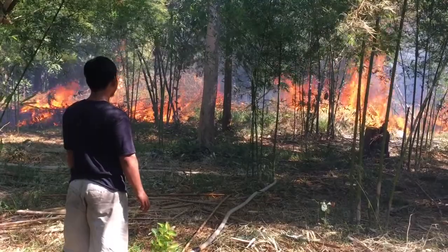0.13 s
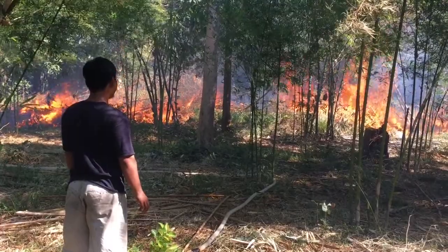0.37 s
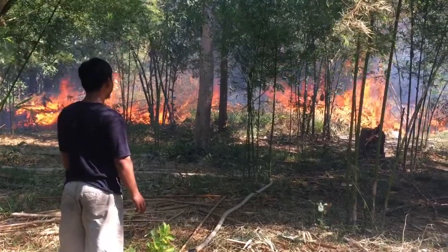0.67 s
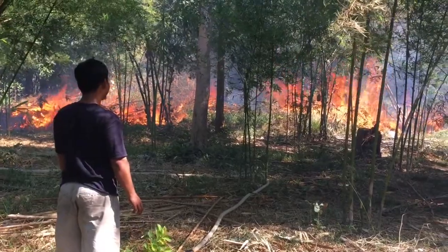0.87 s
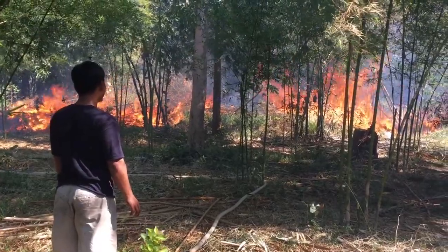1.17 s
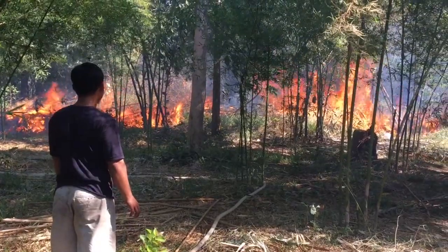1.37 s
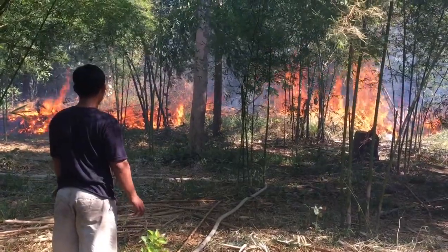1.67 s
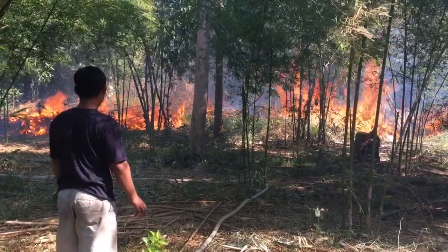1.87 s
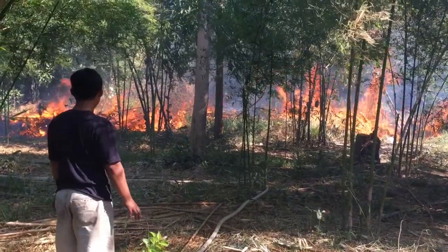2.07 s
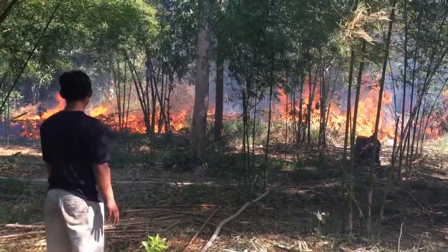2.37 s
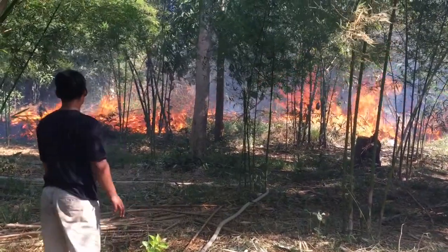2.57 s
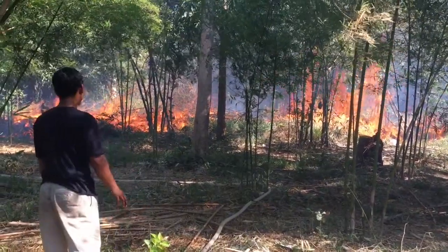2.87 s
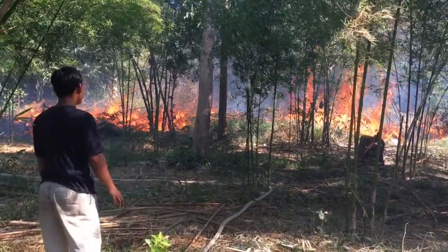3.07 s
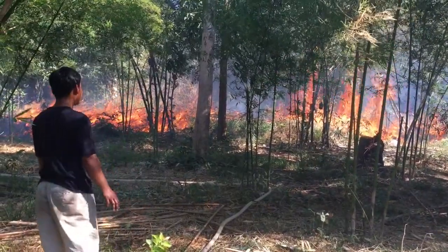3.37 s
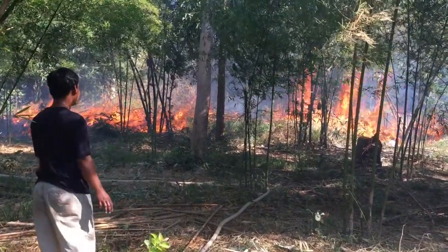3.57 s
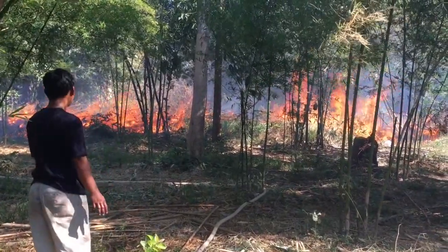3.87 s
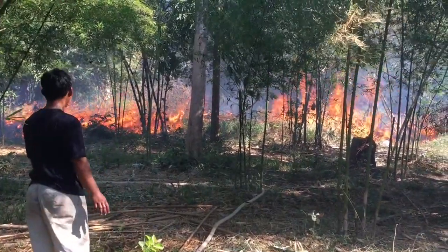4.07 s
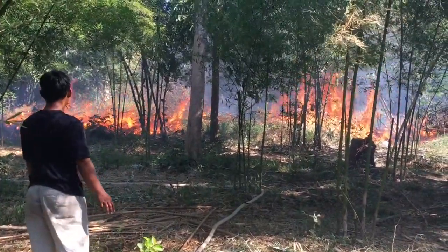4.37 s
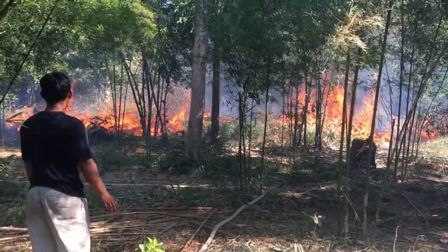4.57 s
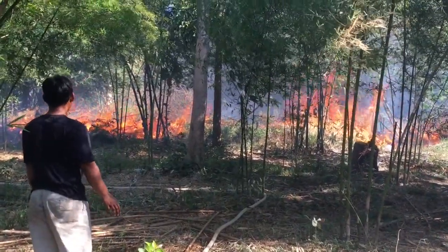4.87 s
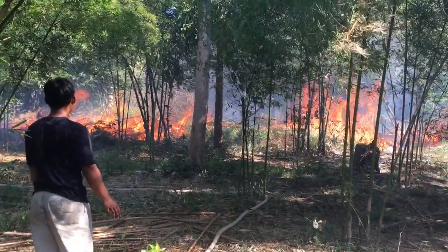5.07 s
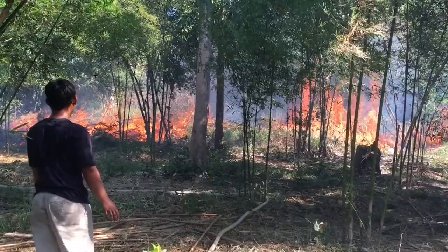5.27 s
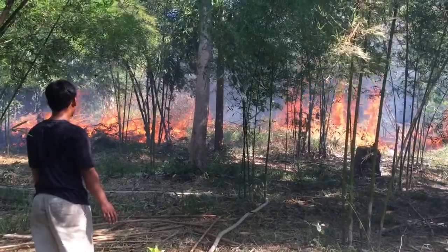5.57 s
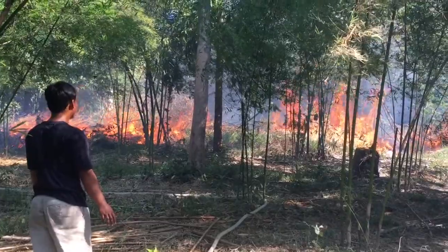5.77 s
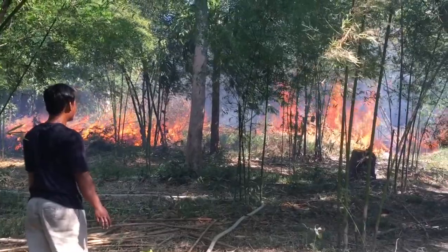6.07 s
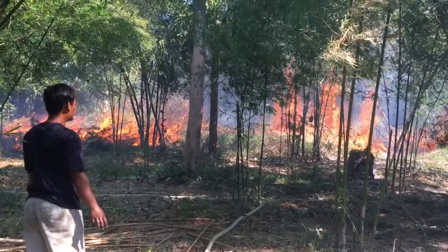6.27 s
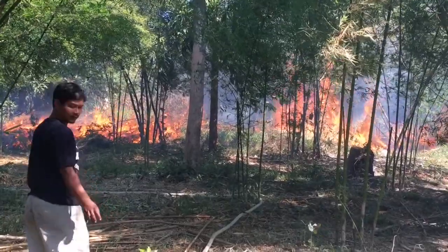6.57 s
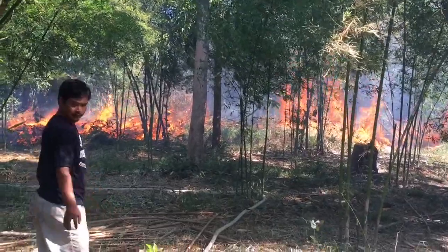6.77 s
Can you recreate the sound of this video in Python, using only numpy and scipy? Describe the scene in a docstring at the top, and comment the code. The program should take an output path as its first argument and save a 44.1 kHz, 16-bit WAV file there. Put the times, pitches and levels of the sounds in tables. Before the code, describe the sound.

Burning bamboo pops and cracks irregularly, with occasional loud culm explosions echoing among the stems over sizzling steam and a soft, billowing rumble.

```python
"""Sharp pops and a few heavy bursts ring out over crackle, hiss and a low rumble: fire in a bamboo grove.
It runs through the undergrowth some twenty metres from a hand-held microphone.
Splitting stems are damped pulses; a sealed culm is a crack with a thud, and a rip before or after the thud.
Twigs and leaves snap at random. Reports scatter among near stems, glance off the ground and echo in the grove.
Under them, banded noise ticks make the hiss of sap and steam, and low noise makes the rumble of the flames."""
import sys
import numpy as np
from scipy import signal
from scipy.fft import rfft, irfft
from scipy.io import wavfile
from scipy.ndimage import uniform_filter1d, minimum_filter1d

SR = 44100
rng = np.random.default_rng(int(sys.argv[2]) if len(sys.argv) > 2 else 0)


def transcribe(u):
    """Save the signal u as a 16-bit wav file named by the first command-line argument.

    u: samples, shape (n,) or (channels, n), limited to [-1, 1]; the rate is SR.
    q: integer samples, one column per channel.
    """
    v = np.clip(np.atleast_2d(u).T, -1, 1)
    q = np.round(v * 32767).astype(np.int16)
    wavfile.write(sys.argv[1], SR, q)


N = 305613
TIME = np.arange(N) / SR

# The loudest splitting stems, levels relative to one another:
# (time [s], level [dB], pitch [Hz], spread [octaves], scattered share [dB])
SPLITTING_STEMS = [(.0219, -10, 3600, 0.71, -27), (.17, -15, 2530, 0.38, -4), (.3124, -14, 2500, 0.52, -22),
                   (.3747, -15, 3680, 1.06, -1), (.4319, -6, 5630, 0.48, -20),
                   (.7237, -17, 5260, 0.42, -22), (.8495, -8, 1460, 0.77, -4), (.8736, -12, 4900, 1.2, -15),
                   (.9145, -11.5, 2800, 0.58, -4), (.9187, -9, 2950, 0.53, -11),
                   (.9926, -18, 7450, 0.65, 6), (1.0357, -18, 10000, 0.85, -2),
                   (1.0956, -14, 2530, 0.9, -10), (1.1951, -11, 8450, 0.92, -12),
                   (1.2595, -12, 4370, 0.71, 12), (1.4814, -18, 2270, 1.6, -26),
                   (1.6771, -15, 2550, 1.46, -6), (1.7493, -15, 5400, 1.46, -25),
                   (1.7841, -12, 4370, 0.82, -23), (2.0024, -13.5, 3500, 0.89, 6),
                   (2.0906, -8.5, 2940, 0.56, -11), (2.1534, -16, 5000, 0.56, -13),
                   (2.5239, -11.5, 1390, 0.62, 3), (2.8826, -16, 4640, 0.79, -4),
                   (3.0312, -10, 2700, 1.2, -1), (3.0581, -14.5, 3940, 0.92, -7),
                   (3.1712, -9, 3860, 0.57, -8), (3.2268, -15.5, 4200, 1.6, 6),
                   (3.4563, -6.5, 1880, 0.67, -5), (3.5791, -14.5, 3030, 0.65, -15),
                   (3.6565, -8, 3860, 0.67, -13), (3.6817, -15, 3100, 1.1, -2), (3.697, -17, 2780, 1.9, -9),
                   (3.7937, -15.5, 3100, 1.1, -7), (3.9021, -17, 5070, 0.65, -11),
                   (3.9205, -18.5, 3940, 0.97, -1), (4.0544, -11, 2320, 0.34, -17),
                   (4.1129, -16.5, 3930, 0.59, 0), (4.1616, -15.5, 2340, 1.8, 9),
                   (4.2353, -9, 3160, 0.33, -13), (4.7188, -15, 3240, 1.3, 19),
                   (4.7624, -13, 4400, 0.76, 0), (4.8777, -12.5, 3050, 0.83, -10),
                   (4.918, -15.5, 2460, 0.98, 15), (5.0462, -9, 2430, 0.96, 3),
                   (5.2503, 1.5, 3020, 1.16, -26), (5.4726, -17.5, 7300, 0.63, -22),
                   (5.5193, -16, 3580, 0.64, -19), (5.5697, -15, 1550, 0.81, 1),
                   (5.6426, -11.5, 1660, 1, 0.5), (5.7274, -9, 1480, 0.83, 3),
                   (5.7888, -10.5, 4320, 0.85, -2), (5.907, -16.5, 3940, 0.68, 0),
                   (5.9847, -12, 3960, 1.34, 4), (6.001, -16, 4480, 1.2, 4), (6.1305, -15.5, 3940, .5, -14),
                   (6.1538, -15.5, 1280, .85, -9), (6.2076, -12, 3040, 0.56, -2.5),
                   (6.2824, -15, 3130, 1.4, -4), (6.3229, -18, 2040, 0.48, -6.5),
                   (6.4825, -13, 2020, 0.84, 3), (6.6583, -14, 4430, 0.94, 21)]
# Sealed culms bursting under steam pressure, levels relative to one another:
# (time [s], crack level [dB], crack pitch [Hz], thud level [dB], rip level [dB], rip pitch [Hz],
#  rip lag behind the crack [s], scattered share [dB])
BURSTING_CULMS = [(1.269, -20, 650, -21, -27, 690, 0.046, 17),
                  (2.029, -5.5, 765, -7.5, -2.5, 1930, .0035, -6.5),
                  (2.687, -13.5, 656, -15, -11.5, 1810, 0.00065, 4.5),
                  (3.838, -22, 885, -18.5, -9.5, 2070, 0.00053, -6),
                  (4.258, -7, 507, -5, -21, 2020, .005, -2), (4.3455, -2, 690, 5, 0.5, 676, .0115, -6.5),
                  (4.621, -1, 600, -4.5, -6.5, 1160, 0.0053, -1),
                  (6.773, -17, 700, -17.5, -16.5, 1430, 0.00096, 0)]
# How hard the fire burns, before its random flares: (time [s], level [dB])
BLAZE_LEVEL = [(0, -33), (.4, -35), (.68, -36.5), (.9, -31.5), (1.1, -35), (1.28, -32.5), (1.53, -35),
               (1.7, -31), (1.9, -39.5), (2.08, -33), (2.45, -36), (3.1, -31), (3.45, -34.5), (4.78, -33),
               (5.15, -36.5), (5.9, -34.5), (6.7, -35), (6.93, -42)]
# The flames billow up: (time [s], rise of the rumble [dB])
FLAME_BILLOWS = [(.5, 1), (.8, 8), (1.25, 10), (1.9, 3.5), (4.32, 14), (4.95, 2.5), (5.5, 3.5), (5.92, 3),
                 (6.86, 8.5)]
# Spectrum of steam and far crackle: (frequency [Hz], relative density [dB per Hz])
HISS_SPECTRUM = [(150, -6), (250, 1), (484, -8), (566, -7.5), (761, -7.5), (971, -9.5), (2760, -2),
                 (4900, -4.5), (5830, -2), (7570, -9), (12300, -9), (15200, -14), (16000, -75)]
# Spectrum of the turbulent flames: (frequency [Hz], relative density [dB per Hz])
FLAME_SPECTRUM = [(20, -30), (32, -18), (48, -1), (75, -0.5), (120, -4), (190, -4), (280, -24.5),
                  (420, -45), (900, -34)]
# Cancellations by the soft ground: (frequency [Hz], width [Hz], depth [0-1])
GROUND_CANCELLATIONS = [(406, 220, 0.37), (760, 124, 0.33)]
# Echo of the grove: (frequency [Hz], level [dB], time to fall by 60 dB [s])
GROVE_ECHO = [(150, -28, 0.35), (350, -10, 0.64), (624, -10, 1), (1150, -9.5, 0.77), (2560, -3.5, 0.28),
              (6060, -3, 0.24), (14000, -2.5, 0.2)]
# Dips of the microphone port: (frequency [Hz], width [Hz], depth [0-1])
MICROPHONE_PORT = [(4870, 730, 0.31), (10420, 210, 1)]

PULSE_SAMPLES = 2048  # length of one report
PLACES = 5  # places along the fire, each with its own echo
CULM_HZ, THUD_LAG_S = 177.5, 0.0018  # the emptying chamber, just after the crack
CRACK_OCTAVES, THUD_OCTAVES, RIP_OCTAVES = 0.4, 0.56, 0.52  # spread of each part of a burst
BURST_NEAR_DB, BURST_ECHO_DB = 1.5, 3  # the thick culms stand deep in the grove and roll on in its echo
FLARE_PER_S, FLARE_DB = 9, 2.07  # tufts of undergrowth catch and die down
RUMBLE_DB, BILLOW_RISE_S, BILLOW_FALL_S = -42, 0.052, 0.087
TOP_HZ = 15900  # upper limit of the microphone channel


def snap(hz, octaves):
    """Pressure pulse of one fracture: a sudden front and a heavily damped ring around hz."""
    f = np.maximum(np.fft.rfftfreq(PULSE_SAMPLES, 1 / SR), 10)
    offset = np.log2(f / hz) / octaves
    log_spectrum = -np.log(np.cosh(offset * np.pi / np.sqrt(12))) - np.log(f) / 2
    # folding the cepstrum gives minimum phase: the energy comes as early as it can
    cepstrum = irfft(log_spectrum)
    cepstrum[1:PULSE_SAMPLES // 2] *= 2
    cepstrum[PULSE_SAMPLES // 2 + 1:] = 0
    return unit(irfft(np.exp(rfft(cepstrum))))


def reports(rows, splinter_db, splinter_s, scatter_s):
    """Each fracture tears more fibres at once, then returns from the stems around it.

    Gives the near sound and what goes on into the grove, with one track per place."""
    near, far = np.zeros((PLACES, N)), np.zeros((PLACES, N))
    t = np.arange(PULSE_SAMPLES) / SR
    for k, (s, db, hz, octaves, scatter_db) in enumerate(rows):
        place = k % PLACES
        pulse = snap(hz, octaves)
        fibres, stems = rng.standard_normal((2, PULSE_SAMPLES))

        # cubing and squaring the noise leave a few strong fibres and stems
        fibre_train = fibres ** 3 * t * np.exp(-t / splinter_s)
        tear = signal.fftconvolve(pulse, fibre_train)[:PULSE_SAMPLES]
        direct = unit(pulse + undb(splinter_db) * unit(tear))

        stem_train = stems * abs(stems) * (1 - np.exp(-t / 0.0013)) * np.exp(-t / scatter_s)
        scatter = signal.fftconvolve(pulse, stem_train)[:PULSE_SAMPLES]
        report = unit(direct + undb(scatter_db) * unit(scatter))

        # the level counts the energy as if spread over 1 ms
        sound = undb(db) * np.sqrt(SR / 1000) * report
        add(near[place], s, sound)
        # stems in plain sight sound dry, hidden ones wet
        add(far[place], s, sound * undb(0.61 * np.clip(scatter_db, -20, 0)))
    return np.array([near, far])


def splitting_stems():
    """Stems split with sharp pops, each a fracture with a strong tear of fibres."""
    return undb(2.0) * reports(SPLITTING_STEMS, splinter_db=0.0, splinter_s=0.00056, scatter_s=0.0035)


def bursting_culms():
    """The wall of a sealed culm cracks and the steam leaves with a thud;
    the split rips along the stem, before or after the thud."""
    parts = []
    for s, crack_db, crack_hz, thud_db, rip_db, rip_hz, rip_lag_s, scatter_db in BURSTING_CULMS:
        parts += [(s, crack_db, crack_hz, CRACK_OCTAVES, scatter_db),
                  (s + THUD_LAG_S, thud_db, CULM_HZ, THUD_OCTAVES, scatter_db),
                  (s + rip_lag_s, rip_db, rip_hz, RIP_OCTAVES, scatter_db)]
    near_and_far = reports(parts, splinter_db=-9.0, splinter_s=0.0011, scatter_s=0.0037)
    return near_and_far * undb([BURST_NEAR_DB, BURST_ECHO_DB])[:, None, None]


def twigs(count, db, range_db, hz, pitch_octaves, spread, scatter_db):
    """Small fuel snaps at random, each piece at its own pitch; few are loud."""
    when, size, width = rng.random((count, 3)).T
    pitch, depth = rng.standard_normal((count, 2)).T
    # evenly spaced, then each delayed by up to three spacings, wrapping at the end
    s = (np.arange(count) + 3 * when) % count / count * N / SR
    level_db = db - range_db * np.sqrt(size)
    pitch_hz = np.minimum(hz * 2 ** (pitch_octaves * pitch), 14000)
    octaves = spread * (0.5 + width)
    rows = np.transpose([s, level_db, pitch_hz, octaves, scatter_db + 5 * depth])
    return reports(rows, splinter_db=-4, splinter_s=0.00045, scatter_s=0.0038)


def crackle():
    """Canes, sticks and leaves snap, and thick wood knocks dully, before the blaze sets their level."""
    canes = twigs(count=28, db=19, range_db=1.5, hz=4830, pitch_octaves=0.38, spread=0.87, scatter_db=-8)
    sticks = twigs(count=400, db=18.5, range_db=16, hz=3600, pitch_octaves=0.98, spread=0.74,
                   scatter_db=-3.5)
    leaves = twigs(count=100, db=13, range_db=28, hz=10700, pitch_octaves=0.5, spread=0.92,
                   scatter_db=-11)
    knocks = twigs(count=16, db=15, range_db=7, hz=440, pitch_octaves=0.63, spread=1.3, scatter_db=3.5)
    return canes + sticks + leaves + knocks


def blaze():
    """Gain of crackle and hiss: how hard the fire burns, with random flares."""
    return undb(np.interp(TIME, *np.transpose(BLAZE_LEVEL)) + FLARE_DB * walk(FLARE_PER_S))


def hiss(db, grain_db, flicker_db):
    """Dense ticks merge with escaping steam; fuel of each size sizzles in its own band."""
    edges_hz = [100, 1200, 2500, 4500, 7000, 11000, 17000]
    sizzle = 0
    for low, high in zip(edges_hz, edges_hz[1:]):
        tick_db = grain_db * np.minimum(rng.exponential(size=N), 6)
        ticks = rng.standard_normal(N) * undb(tick_db)
        band = signal.sosfilt(signal.butter(3, [low, high], "band", fs=SR, output="sos"), ticks)
        sizzle = sizzle + band * undb(flicker_db * walk(160) + walk(12))
    return undb(db) * colour(sizzle, HISS_SPECTRUM)


def billows():
    """Level of the rumble in dB: each billow swells quickly and sinks back."""
    level_db = RUMBLE_DB
    for s, rise_db in FLAME_BILLOWS:
        distance = np.maximum((s - TIME) / BILLOW_RISE_S, (TIME - s) / BILLOW_FALL_S)
        level_db = level_db + rise_db * np.exp(-distance)
    return level_db


def flames(rumble_db, flutter_db):
    """Burning gas billows in low puffs: low noise whose level flutters."""
    level_db = rumble_db + flutter_db * walk(12) + 2 * walk(30)
    return colour(rng.standard_normal(N), FLAME_SPECTRUM) * undb(level_db)


def ground(x):
    """The path that glances off the soft ground cancels the direct one in the low mids."""
    return notch(x, GROUND_CANCELLATIONS)


def grove(x, build_s):
    """The many stems return a diffuse echo; the foliage swallows its treble first."""
    t = TIME[:int(1.5 * SR)]
    hz, db, t60 = np.transpose(GROVE_ECHO)
    log_f = np.log(np.maximum(np.fft.rfftfreq(len(t), 1 / SR), 1))
    noise, response = rfft(rng.standard_normal(len(t))), 0
    # each row of the identity picks one band, crossfading into its neighbours
    for band, band_db, decay_s in zip(np.eye(len(hz)), db, t60):
        fade = unit((1 - np.exp(-t / build_s)) * np.exp(-np.log(1000) * t / decay_s))
        band_noise = irfft(noise * np.interp(log_f, np.log(hz), band), len(t))
        response = response + undb(band_db) * fade * band_noise
    return signal.fftconvolve(x, response)[:N]


def undb(db):
    """Decibels to gain."""
    return 10 ** (np.asarray(db) / 20)


def unit(x):
    """Scale to an energy of one."""
    return x / np.sqrt(np.sum(x ** 2))


def add(out, s, sound):
    """Mix a sound in at time s."""
    i = int(np.clip(s * SR, 0, N - 1))
    out[i:i + len(sound)] += sound[:N - i]


def walk(rate):
    """Random levels held 1 / rate s and slewed twice; spread near one."""
    k = int(SR / rate)
    held = np.repeat(rng.standard_normal(N // k + 1), k)
    return 1.3 * uniform_filter1d(uniform_filter1d(held, k), k)[:N]


def colour(x, points):
    """Weight the spectrum of x by (Hz, dB) points and scale it to an rms of one."""
    hz, db = np.transpose(points)
    f = np.maximum(np.fft.rfftfreq(N, 1 / SR), 1)
    y = irfft(rfft(x) * undb(np.interp(np.log(f), np.log(hz), db)), N)
    return y / y.std()


def notch(x, dips):
    """Carve (Hz, width Hz, depth) dips into the spectrum."""
    for hz, width, depth in dips:
        x = x - depth * signal.lfilter(*signal.iirpeak(hz, hz / width, fs=SR), x)
    return x


def limiter(x, size):
    """Turn the gain down smoothly for a millisecond or two around each peak over full scale."""
    gain = 1 / np.maximum(abs(x), 1)
    return x * uniform_filter1d(minimum_filter1d(gain, size), size)


def scene():
    """Pops, bursts and crackle with their ground glance and echoes, over hiss and rumble."""
    burning = blaze()
    near, far = splitting_stems() + bursting_culms() + crackle() * burning
    echo = sum(grove(place, build_s=0.00089) for place in far)
    bed = burning * hiss(db=-3.0, grain_db=3.0, flicker_db=4) + flames(billows(), flutter_db=3.0)
    return (ground(near.sum(axis=0) + echo) + bed)[None]


def record(dry):
    """The microphone drops deep bass and notches the treble; loud peaks are limited and the top is cut."""
    bass_cut = signal.butter(4, 25.3, "high", fs=SR, output="sos")
    heard = notch(signal.sosfilt(bass_cut, dry), MICROPHONE_PORT)
    limited = 0.96 * limiter(heard, size=45)
    top_cut = signal.ellip(10, 0.2, 90, TOP_HZ, fs=SR, output="sos")
    return signal.sosfilt(top_cut, limited)


dry = scene()
out = record(dry)
transcribe(out)
```